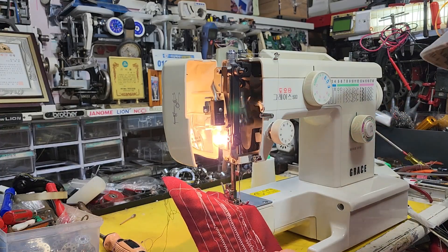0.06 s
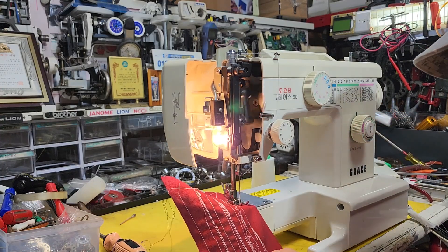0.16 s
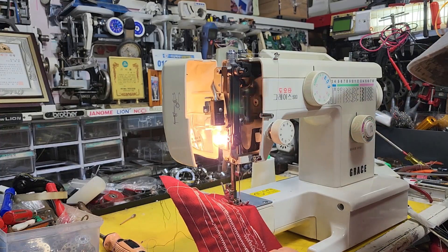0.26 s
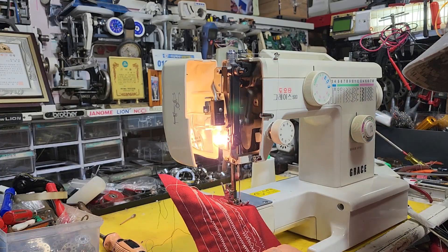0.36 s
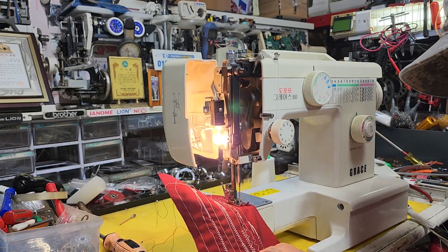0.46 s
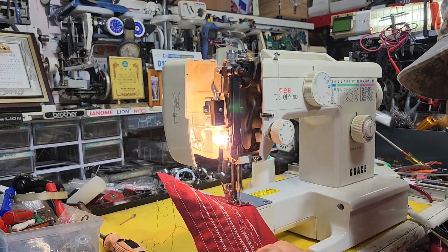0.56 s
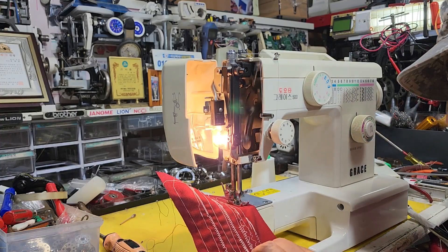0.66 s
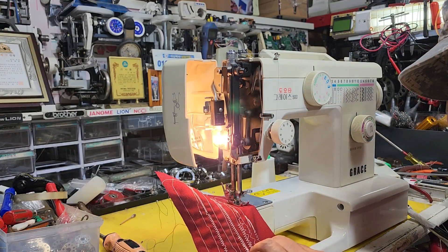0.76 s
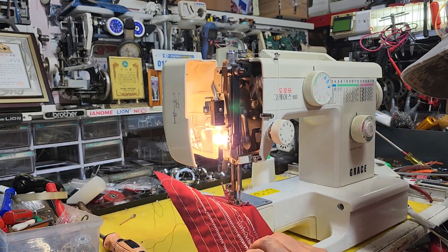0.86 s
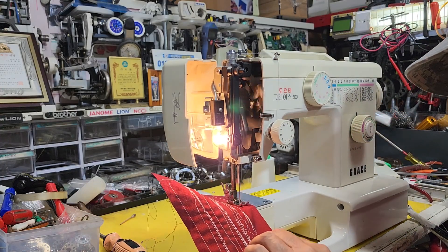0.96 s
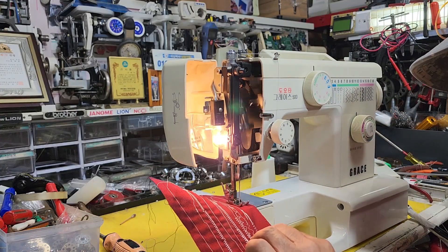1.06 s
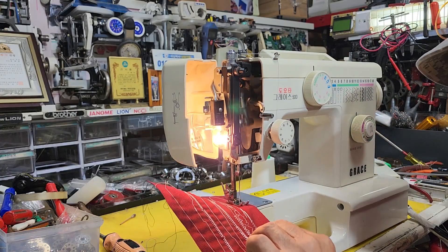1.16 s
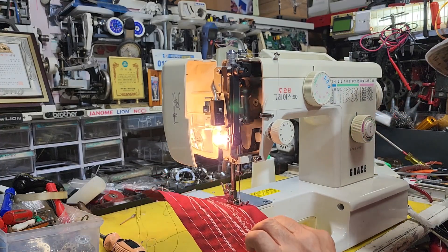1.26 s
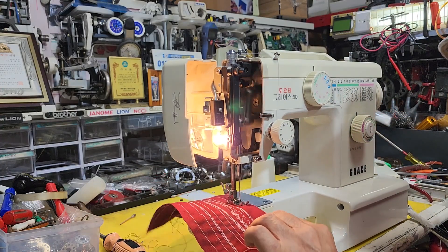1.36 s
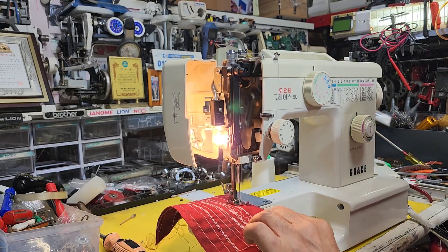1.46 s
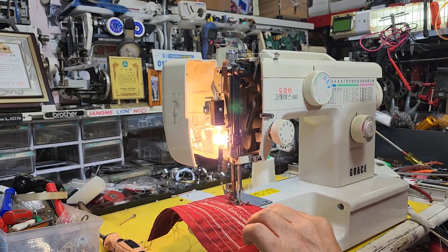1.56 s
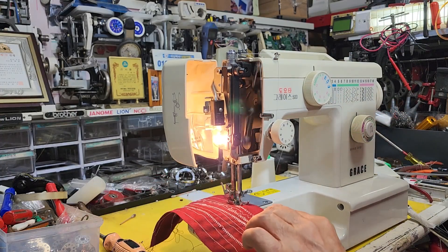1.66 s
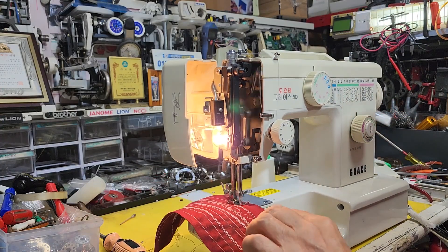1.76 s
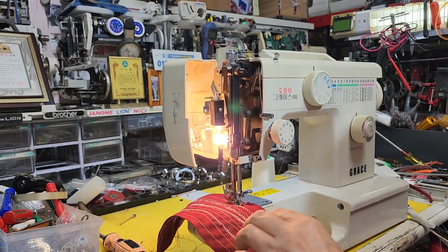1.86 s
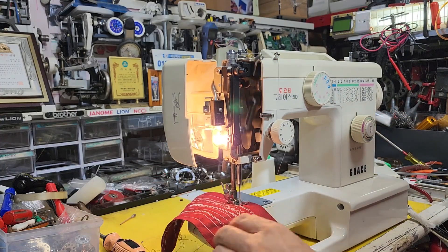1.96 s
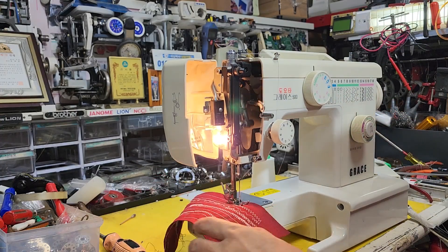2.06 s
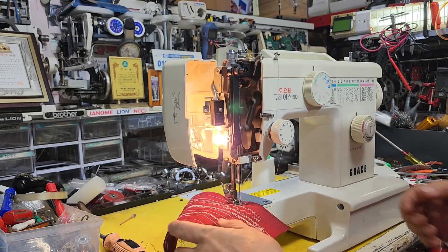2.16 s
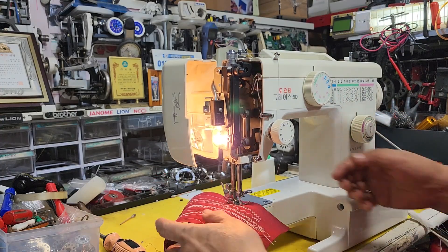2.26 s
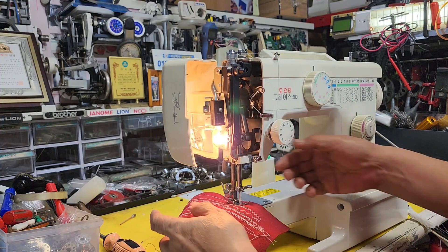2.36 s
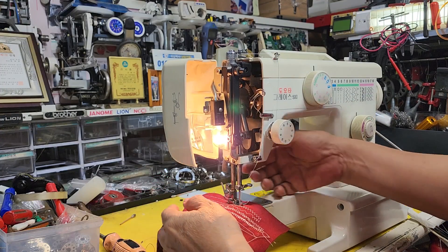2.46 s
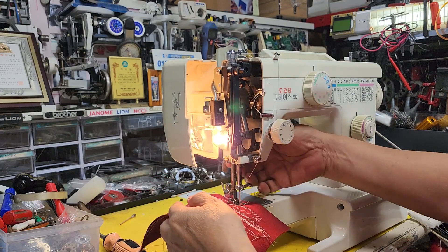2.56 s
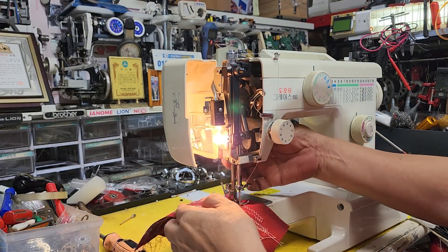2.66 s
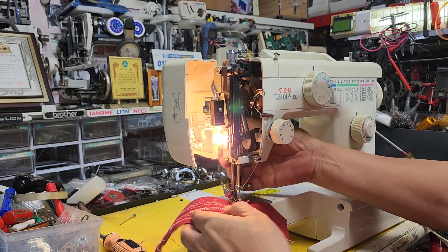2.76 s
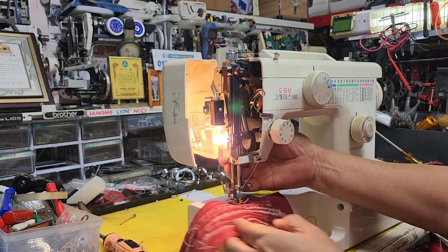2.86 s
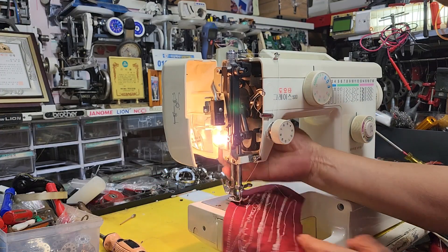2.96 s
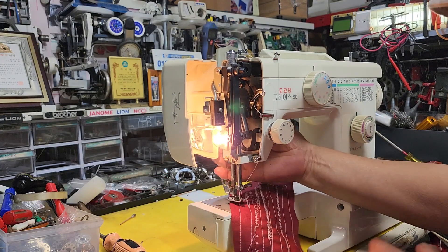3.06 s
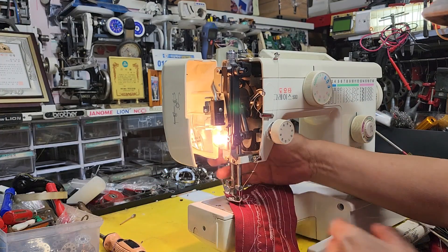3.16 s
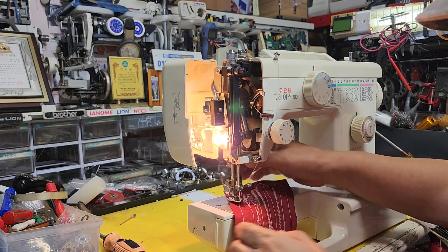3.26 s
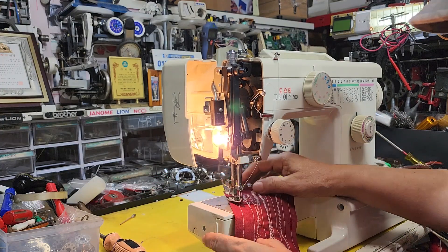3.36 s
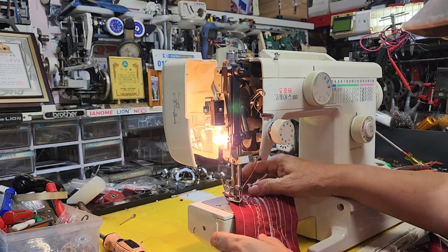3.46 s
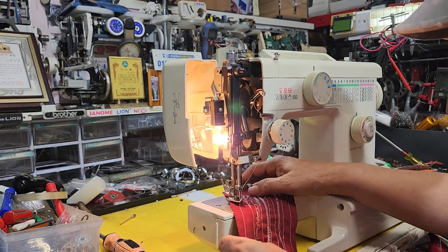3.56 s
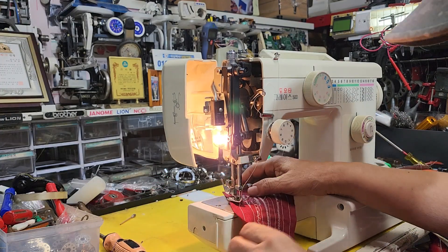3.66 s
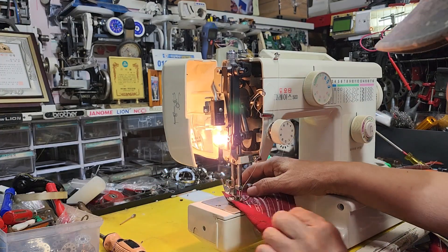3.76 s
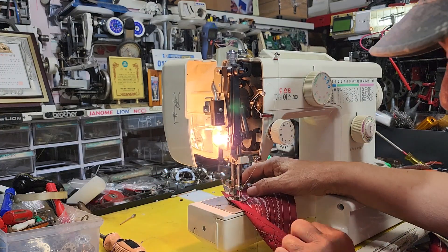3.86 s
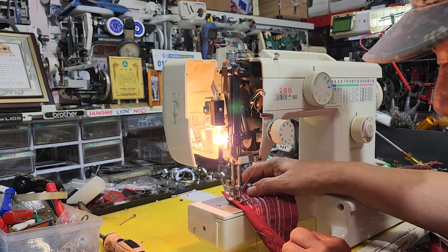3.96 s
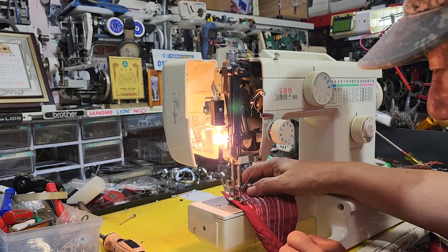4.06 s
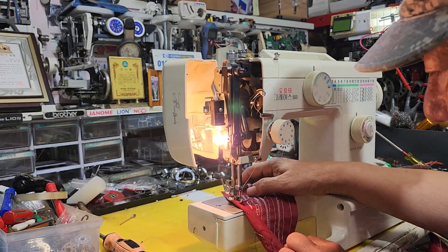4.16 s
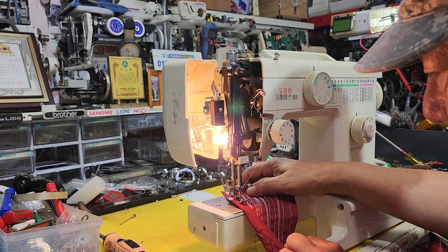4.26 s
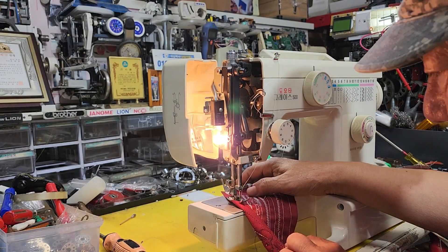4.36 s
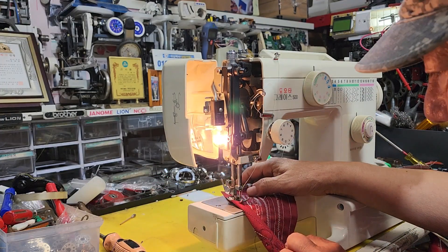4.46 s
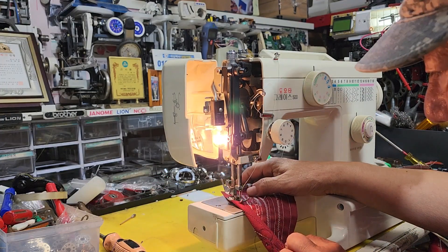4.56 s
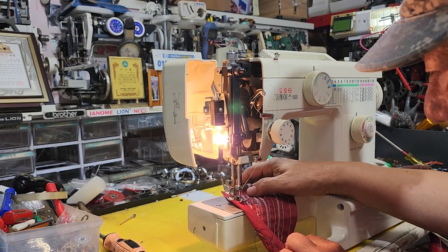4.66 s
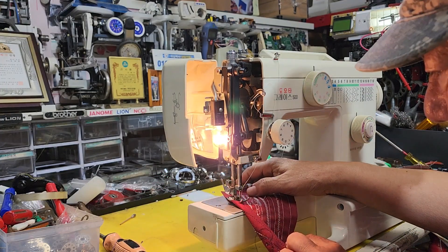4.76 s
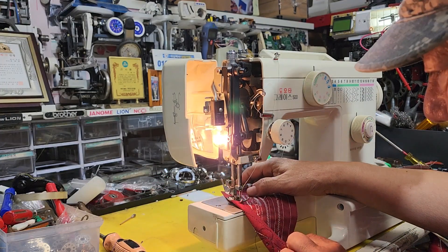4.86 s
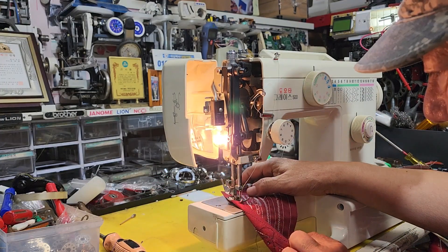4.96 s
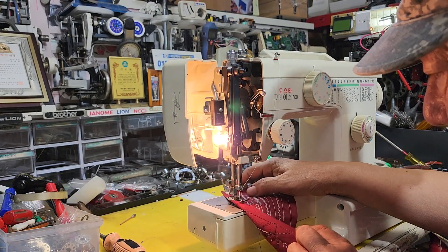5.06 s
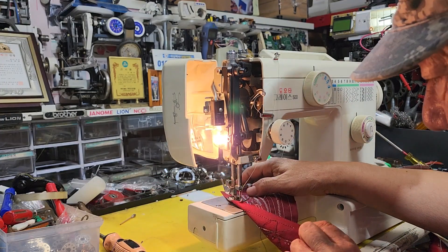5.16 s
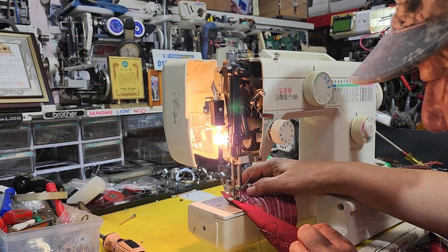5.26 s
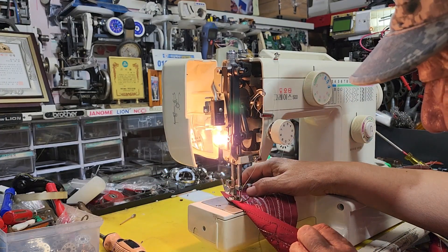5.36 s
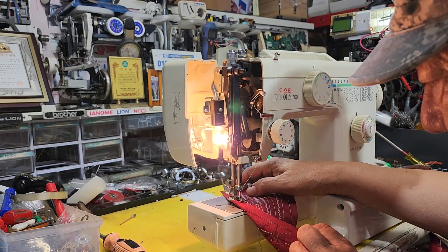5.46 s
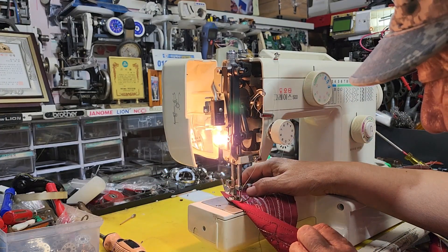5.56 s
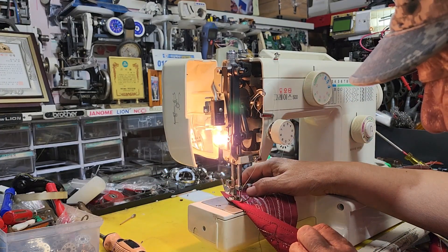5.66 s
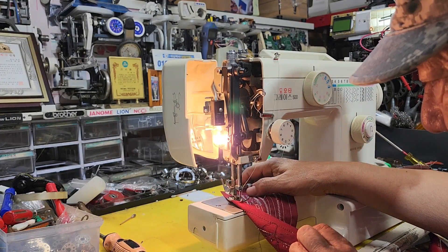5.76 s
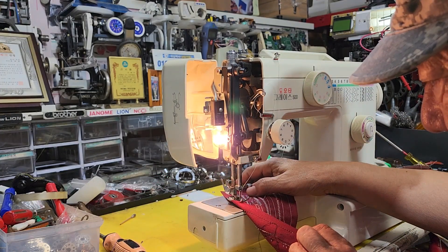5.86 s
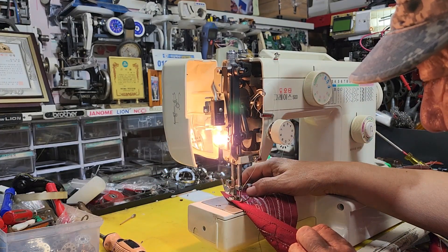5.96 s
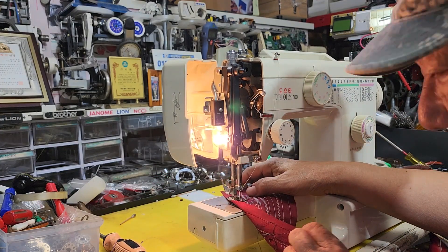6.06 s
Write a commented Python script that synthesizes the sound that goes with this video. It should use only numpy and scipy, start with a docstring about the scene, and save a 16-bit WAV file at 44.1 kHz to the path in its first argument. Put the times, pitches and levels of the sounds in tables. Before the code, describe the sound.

A household sewing machine clatters rapidly close by, coasts to a stop, then its presser foot lever snaps and clacks over a slowly swelling workshop hum.

```python
"""In a crowded workshop, a household sewing machine close by runs at eleven stitches a second and coasts to a
stop. Every turn of its shaft repeats the same short knocks and noisy ticks; shaped noise makes the drive whirr,
and tones tied to the shaft speed make the motor whine. Then the presser foot is lifted and dropped, heard as
rings, cracks and thuds, among soft bumps and rustles of noise. Behind it lie a fan's rush of noise and a low
hum of two close tones that beat; the background slowly grows louder."""
import sys
import numpy as np
from scipy import signal
from scipy.fft import rfft, irfft, next_fast_len
from scipy.io import wavfile

SR = 44100
rng = np.random.default_rng(int(sys.argv[2]) if len(sys.argv) > 2 else 0)


def store_wav(level_fs):
    """Save 16-bit WAV to argv[1]."""
    pcm = np.round(np.clip(np.atleast_2d(level_fs), -1, 1) * 32767)
    wavfile.write(sys.argv[1], SR, pcm.T.astype(np.int16))


N = 269387
TIME = np.arange(N) / SR


def undb(db):
    """Turn decibels into a gain."""
    return 10 ** (np.asarray(db) / 20)


def unit(x):
    """Scale to rms 1."""
    return x / np.sqrt(np.mean(x ** 2) + 1e-18)


def curve(rows):
    """Join (time [s], value) rows by straight lines."""
    return np.interp(TIME, *np.transpose(rows))


def walk(rate):
    """Slow random wander through `rate` new points a second, joined by straight lines."""
    points = rng.standard_normal(int(N / SR * rate) + 2)
    return 1.015 * np.interp(TIME * rate, np.arange(len(points)), points)


def ring(x, hz, width):
    """One resonance lets through the sound near its pitch, with gain 1 at its centre."""
    centre = min(hz, .45 * SR)
    sharpness = hz / min(width, SR / 4)
    return signal.lfilter(*signal.iirpeak(centre, sharpness, fs=SR), x)


def ring_twice(x, hz, width):
    """Two equal resonances in a row fall off more steeply on both sides."""
    return ring(ring(x, hz, width), hz, width)


def colour(x, spectrum):
    """Shape a sound by (frequency [Hz], level [dB]) points, joined on a log scale; rms 1."""
    hz, db = np.transpose(spectrum)
    size = next_fast_len(N)
    bins = np.maximum(np.arange(size // 2 + 1) * SR / size, 1)
    gain = undb(np.interp(np.log(bins), np.log(hz), db))
    return unit(irfft(rfft(x, size) * gain, size)[:N])


def band(hz, width):
    """Noise in one resonance with steep sides; rms 1."""
    return unit(ring_twice(rng.standard_normal(N), hz, 1.2 * width))


def grit(spread_db):
    """Dense tiny contacts of uneven size: noise whose level wanders fast; rms 1."""
    return unit(rng.standard_normal(N) * undb(spread_db * walk(1500)))


def add(out, s, sound):
    """Mix a sound in at time s."""
    start = int(np.clip(s * SR, 0, N))
    out[start:start + len(sound)] += sound[:N - start]


def blows(times, dbs, lengths):
    """Loudness shape of blows that start at once and die away; overlapping blows add as power."""
    power = np.zeros(N)
    for s, db, length in zip(times, dbs, lengths):
        add(power, s, (undb(db) * np.exp(-TIME[:SR // 5] / length)) ** 2)
    return np.sqrt(power)


def moments(turns, share):
    """Times at which the shaft passes one point of its turn."""
    passes = np.arange(np.ceil(turns[0] - share), turns[-1] - share) + share
    return np.interp(passes, turns, TIME)


def room(x, wet_db, t60):
    """Crowded shelves scatter a short tail of noise that fades by 60 dB in t60 seconds."""
    t = TIME[:SR // 2]
    fade = np.exp(-np.log(1000) * t / t60) * (1 - np.exp(-t / 0.0081))
    tail = rng.standard_normal(len(t)) * fade
    return x + undb(wet_db) * signal.fftconvolve(x, tail / np.linalg.norm(tail))[:N]


def machine():
    """The shaft's speed times and drives every moving part; the needle works in the open, so its ticks stay dry."""
    # main shaft: (time [s], speed [stitches per second])
    shaft_speed = [(0, 10.25), (.3, 10.8), (.8, 11.0), (1.5, 11.04), (1.78, 10.98), (1.87, 10.3),
                   (1.95, 9.0), (2.05, 6.5), (2.2, 4.0), (2.4, 0)]
    speed = curve(shaft_speed)
    turns = .194 + np.cumsum(speed) / SR  # the shaft starts part-way through a turn
    # louder when faster, and easing a little along the seam
    run_db, ease_db_per_s, speed_power = 3.5, 1.6, 1
    effort = undb(run_db - ease_db_per_s * TIME) * (speed / speed.max()) ** speed_power
    knocks = room(effort * linkage(turns), wet_db=-7, t60=0.29)
    return knocks + effort * (needle(turns) + drive(turns))


def linkage(turns, knock_db=-4, scatter_db=0.1, jitter_s=0.00028):
    """Cranks reverse at fixed shaft angles, and each knock rings the casing briefly."""
    # knocks in each turn: (place [share of the turn], level [dB], pitch [Hz], width [Hz])
    knock_rows = [(0.015, 5, 930, 220), (0.041, -2.5, 503, 85), (.13, -4, 486, 95), (.18, 5.5, 953, 220),
                  (.265, -9, 556, 112), (0.383, 5, 870, 180), (.435, 3, 1175, 254), (.445, -9.5, 486, 90),
                  (.595, -0.5, 506, 68), (.76, 0.5, 750, 150)]
    out, t = np.zeros(N), TIME[:SR // 12]
    for share, db, hz, width in knock_rows:
        # a wider resonance dies away sooner
        fade = np.exp(-np.pi * width * t) * (1 - np.exp(-t / 0.00092))
        knock = fade * np.sin(2 * np.pi * hz * t)
        times = moments(turns, share)
        for s, (late, size) in zip(times, rng.standard_normal((len(times), 2))):
            add(out, s + jitter_s * late, undb(knock_db + db + scatter_db * size) * knock)
    return out


def needle(turns, tick_db=0.8, soften_db=7):
    """Needle, hook and feed dog tick in the same order at every stitch, more softly as the shaft slows."""
    # ticks in each turn: (place [share of the turn], level [dB], centre [Hz], fade time [s])
    tick_rows = [(0.208, -20.5, 4200, 0.0079), (.262, -18, 10000, 0.0027), (0.523, -17, 5250, 0.0056),
                 (0.559, -14, 3140, 0.004), (0.717, -18, 11300, 0.012), (0.758, -11.5, 10500, 0.0096),
                 (0.832, -29, 5800, 0.0074), (0.964, -16, 8500, 0.006), (0.988, -12, 8300, 0.004)]
    # tone of the steel parts: (frequency [Hz], level [dB])
    steel_tone = [(300, 2), (1700, -3), (2300, 8), (3200, 8.5), (4700, 6), (6200, 2.5), (8000, 6.5),
                  (11600, 1), (12800, 2), (14100, 0.5), (15500, -10)]
    ticks, step = 0, np.gradient(turns)
    for share, db, hz, length in tick_rows:
        times = moments(turns, share)
        sizes = tick_db + db + rng.standard_normal(len(times))
        noise = unit(ring(grit(3.2), hz, 1.18 * hz))
        ticks = ticks + blows(times, sizes, np.full(len(times), length)) * noise
    softening = undb(soften_db * (step / step.max() - 1.5))
    return colour(ticks, steel_tone) * np.std(ticks) * softening


def drive(turns, whirr_db=-15.5, tone_db=0, flutter=0.0013, drag_db=6, unload_db_per_s=45, rough=0.098):
    """Belt and gears whirr; their tones glide through the casing's resonances and fade as the motor lets go."""
    # whirr of belt and gears: (frequency [Hz], level [dB])
    whirr_tone = [(40, -15), (90, -9.5), (200, -10), (340, -7.5), (450, 2), (560, 4.5), (660, -2.5),
                  (850, 2), (1200, -2.5), (1700, -4.5), (2200, -13), (3100, -9), (4800, -17), (9000, -17.5),
                  (14000, -27), (15700, -36)]
    # gear teeth and the motor's rotor: tones at these multiples of the shaft speed, and their levels [dB]
    multiples = [12.5, 48, 81, 125, 136, 137, 139, 301]
    tone_levels = [-34.5, -24, -25, -22.5, -34, -37.5, -38.5, -41.5]
    # casing resonances that lift a tone gliding through them: (centre [Hz], width [Hz], level [dB])
    casing = [(1135, 52, 13), (1513, 11, 15), (3146, 135, 17.5)]
    motor_off_s = 1.74  # the pedal is released
    step = np.gradient(turns)
    slowing = 1 - step / step.max()
    unloaded = unload_db_per_s * np.maximum(TIME - motor_off_s, 0)
    whirr = undb(whirr_db - drag_db * slowing + 1.82 * walk(70)) * colour(grit(2.46), whirr_tone)
    tones = 0
    for multiple, db in zip(multiples, tone_levels):
        # play between the teeth, in turns, roughens the high tones most
        play = .00022 * walk(130)
        turned = np.cumsum(step * (1 + flutter * walk(39.8))) + play
        angle = 2 * np.pi * multiple * turned + rough * walk(120)
        level = undb(tone_db + db - unloaded + 2.6 * walk(24.12))
        tones = tones + level * np.sin(angle)
    lifted = sum(undb(db) * ring(tones, hz, width) for hz, width, db in casing)
    return whirr + tones + lifted


def chatter(times, dbs, lengths, hz):
    """A short rattling ring after each blow: a noise burst through resonances; levels are peaks."""
    out, t = np.zeros(N), TIME[:SR // 10]
    for s, db, length in zip(times, dbs, lengths):
        burst = rng.standard_normal(len(t)) * np.exp(-t / length)
        rung = ring(ring(burst, hz, .16 * hz), hz, .4 * hz)
        add(out, s, undb(db) * rung / np.abs(rung).max())
    return out


def thud(times, dbs, lengths, hz, width):
    """Blows knock the plastic body, heard as fading noise around its pitch."""
    # tone of the plastic body: (frequency [Hz], level [dB])
    plastic_tone = [(80, -4), (330, 5.5), (620, -0.5), (1200, -6), (1900, -1), (2350, -4.5), (6000, -6)]
    plastic = colour(rng.standard_normal(N), plastic_tone)
    return blows(times, dbs, lengths) * unit(ring_twice(plastic, hz, width))


def crack(times, dbs, lengths):
    """Steel meets steel in a bright, gritty burst."""
    # tone of a single steel contact: (frequency [Hz], level [dB])
    crack_tone = [(300, -6), (1800, 4.5), (2400, -22), (3500, 6), (5000, 4), (6200, 2.5), (9300, 6.5),
                  (12000, -0.5), (15600, -16)]
    return blows(times, dbs, lengths) * colour(grit(2.0), crack_tone)


def needle_bar(crack_s=0.0062, body_s=0.023, ring_db=-7, bounce_s=.0045, bounce_db=-1):
    """Each clack is a steel crack that bounces once, a short ring and a knock of the body."""
    # clacks near the end of the run and as the shaft coasts: (time [s], steel level [dB], body level [dB])
    clack_rows = [(1.683, -14, -32), (1.889, -16.5, -18), (1.99, -10.5, -15.5), (2.11, -21.5, -22),
                  (2.163, -15.5, -18.5), (2.3358, -30, -22)]
    times, steel_db, body_db = np.transpose(clack_rows)
    short, long = np.full(len(times), crack_s), np.full(len(times), body_s)
    bounce = crack(times + bounce_s, steel_db + bounce_db, short)
    steel = crack(times, steel_db, short) + bounce
    rung = chatter(times, steel_db + ring_db, short, hz=3560)
    body = thud(times, body_db, long, hz=900, width=1270)
    return room(steel + rung + body, wet_db=-6, t60=0.52)


def presser_lever(body_stretch=2.23):
    """The small lever rings towards the listener; the large body it strikes fills the room."""
    # the lever snaps up, drops and seats, with rebounds: (time [s], ring level [dB], ring pitch [Hz],
    # steel level [dB], fade time of ring and steel [s], body level [dB], body pitch [Hz], body width [Hz])
    lever_rows = [(2.7172, -3, 3870, -19, 0.0019, -9.5, 910, 260),
                  (2.724, -6.5, 3800, -23, 0.0029, -10, 850, 302),
                  (3.0179, -2.5, 3820, -12.5, 0.0068, -14.5, 1350, 1600),
                  (3.029, -19, 3900, -17.5, 0.0083, -13.5, 790, 1700),
                  (3.1604, -20, 3700, -23, 0.0058, -23.5, 800, 1100)]
    struck, rung = 0, 0
    for s, ring_db, ring_hz, steel_db, length, body_db, body_hz, body_width in lever_rows:
        steel = crack([s], [steel_db], [length])
        body = thud([s], [body_db], [body_stretch * length], body_hz, body_width)
        struck = struck + steel + body
        rung = rung + chatter([s], [ring_db], [length], ring_hz)
    return room(struck, wet_db=-5.0, t60=0.25) + room(rung, wet_db=-16, t60=0.27)


def rattles(tick_s=.0038, body_s=0.011, steel_db=-12, body_db=-4, scatter_db=2):
    """The loose lever makes light, unevenly spaced ticks, each a ring, a crack and a thud."""
    # bursts of rattling: (start [s], end [s], rate [ticks per second], level [dB], ring pitch [Hz])
    rattle_rows = [(0.122, 0.183, 33, -10.5, 4100), (2.449, 2.51, 33, -32.5, 3100),
                   (2.77, 2.953, 17, -32, 3380), (2.967, 3.008, 110, -26, 3800),
                   (3.051, 3.105, 55, -23, 4500), (3.48, 3.487, 125, -33, 3500)]
    out = 0
    for start, end, rate, db, hz in rattle_rows:
        count = max(round((end - start) * rate), 1)
        place, size = rng.random((count, 2)).T
        # each tick falls anywhere within its own slot
        times = start + (np.arange(count) + place) * (end - start) / count
        dbs = db + scatter_db * (2 * size - 1)
        short, long = np.full(count, tick_s), np.full(count, body_s)
        out = out + chatter(times, dbs, short, hz) + crack(times, dbs + steel_db, short)
        out = out + thud(times, dbs + body_db, long, hz=715, width=1300)
    return room(out, wet_db=-7.5, t60=0.31)


def spring(buzz=.45, damped_s=0.025):
    """The presser spring sings on after the blows, buzzing against its rod, until the seated foot damps it."""
    # plucks: (time [s], level [dB], pitch [Hz], time to fade by 60 dB [s])
    pluck_rows = [(2.7158, -32, 9600, 0.023), (3.0179, -24, 9075, 0.6), (3.019, -31, 7400, 0.29),
                  (3.0179, -24, 8888, 0.24), (3.0179, -39, 11000, .2), (3.1611, -24, 8970, 0.15),
                  (3.1605, -13.5, 10030, 0.031)]
    seated_s = 3.165  # the foot comes to rest
    out, t = np.zeros(N), TIME[:SR]
    for s, db, hz, t60 in pluck_rows:
        tone = np.sin(2 * np.pi * hz * t + buzz * walk(200)[:SR])
        add(out, s, undb(db) * np.exp(-np.log(1000) * t / t60) * tone)
    return out / np.hypot(1, np.maximum(TIME - seated_s, 0) / damped_s)


def soft_contacts(rows, width_share, spread_db):
    """Soft contacts: noise that swells and fades around each moment."""
    out, contacts = 0, grit(spread_db)
    for s, db, hz, length in rows:
        sound = unit(ring_twice(contacts, hz, width_share * hz))
        out = out + undb(db) * sound / (1 + ((TIME - s) / length) ** 4)
    return out


def bumps_and_rustles():
    """Low, soft bumps and bright rustles; the last, near 6.1 s, may be the machine starting again."""
    # both: (time [s], level [dB], centre [Hz], time from the middle to half level [s])
    bump_rows = [(.96, -18.5, 293, 0.058), (1.02, -14, 182, 0.041), (1.04, -20.5, 92, 0.065),
                 (2.12, -33, 75, 0.066), (2.47, -28, 79.6, 0.055), (2.48, -35, 555, 0.042),
                 (2.99, -29, 800, .022), (3.04, -29.5, 85, .03), (3.304, -21, 98, 0.0082),
                 (3.505, -21.5, 106, 0.018), (3.505, -26.5, 535, 0.022), (6.1, -12, 83.5, 0.02),
                 (6.095, -21, 516, 0.038)]
    rustle_rows = [(2.4, -43.5, 9900, 0.16), (2.99, -40.5, 7500, 0.05), (3.5, -38.5, 5200, 0.02),
                   (3.8, -49, 8000, 0.26), (4.03, -42.5, 5670, 0.015), (4.22, -48.5, 6200, 0.037),
                   (5.15, -41.5, 11700, 0.05), (5.22, -41, 5500, 0.038), (6.098, -24, 7200, 0.021),
                   (6.09, -24.5, 3000, 0.037)]
    bumps = soft_contacts(bump_rows, width_share=0.63, spread_db=2.5)
    return bumps + soft_contacts(rustle_rows, width_share=1.3, spread_db=3)


def workshop(fan_db=0):
    """A fan's rush of noise with a few resonances, and a beating hum of two close tones; the background slowly
    grows louder."""
    # tone of the workshop air: (frequency [Hz], level [dB])
    air_tone = [(22, -13), (52, 7.5), (85, 1), (140, 2.5), (200, -3.5), (350, -6.5), (450, -1.5),
                (600, -8.5), (950, -10.5), (1300, -10.5), (1900, -13.5), (2150, -18.5), (3100, -28),
                (4500, -29), (15000, -33)]
    # narrow fan resonances: (centre [Hz], width [Hz], level [dB])
    fan_rows = [(59, 12.5, -15), (238, 19, -10.5), (298, 18, -10), (1096, 54, -8.5), (1210, 43, -13.5),
                (1622, 96, -11.5), (1737, 30, -13.5)]
    # levels of the air and of the hum: (time [s], level [dB])
    air_level = [(0, -36.5), (2.6, -36), (3.6, -34.5), (4.2, -34.5), (4.7, -31), (5.4, -29.5), (6.1, -29.5)]
    hum_level = [(0, -44), (2.6, -40), (4.2, -38.5), (4.55, -32.5), (6.1, -31.5)]
    # mains hum beats with the fan's motor, which turns a little slower; the two are in step at in_step_s
    mains_hz, motor_hz, in_step_s = 120, 116.27, 5.13
    motor_db = -6  # relative to the mains hum
    fan = sum(undb(fan_db + db) * band(hz, width) for hz, width, db in fan_rows)
    air = colour(rng.standard_normal(N), air_tone) + fan
    mains = unit(np.cos(2 * np.pi * mains_hz * (TIME - in_step_s)))
    motor = unit(np.cos(2 * np.pi * motor_hz * (TIME - in_step_s)))
    hum = mains + undb(motor_db) * motor
    rush = air * undb(curve(air_level) + 0.78 * walk(14))
    return rush + hum * undb(curve(hum_level) + 0.75 * walk(6))


def scene():
    """Machine, lever, soft bumps and rustles in the workshop."""
    mechanism = machine() + needle_bar() + presser_lever() + rattles() + spring()
    return (mechanism + bumps_and_rustles() + workshop())[None]


def record(dry):
    """The highest peaks are rounded off and the top of the treble is cut."""
    top_hz = 15600
    rounded = dry / (1 + np.abs(dry) ** 6) ** (1 / 6)
    return signal.sosfilt(signal.ellip(10, .2, 80, top_hz, fs=SR, output="sos"), rounded)


dry = scene()
out = record(dry)
store_wav(out)
```